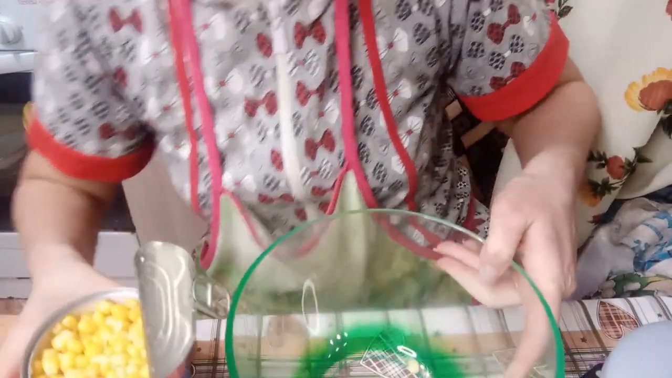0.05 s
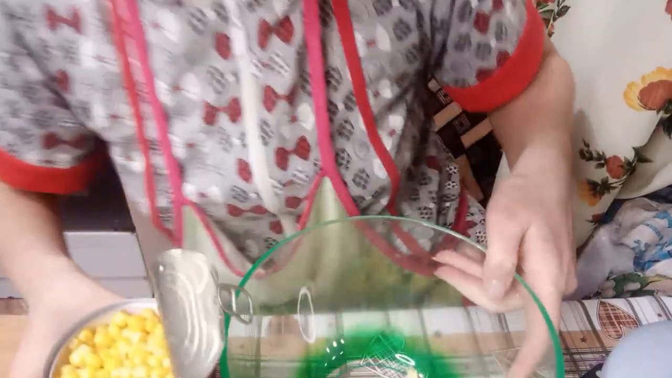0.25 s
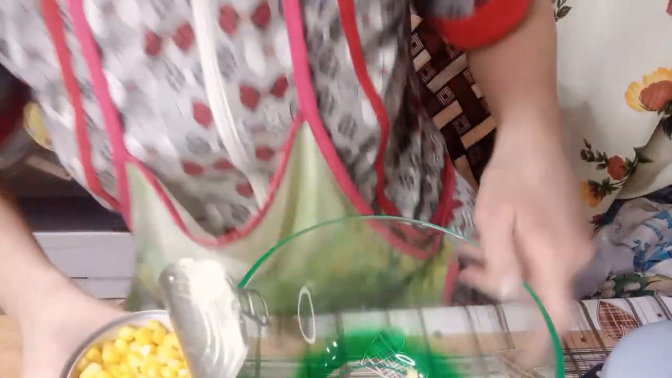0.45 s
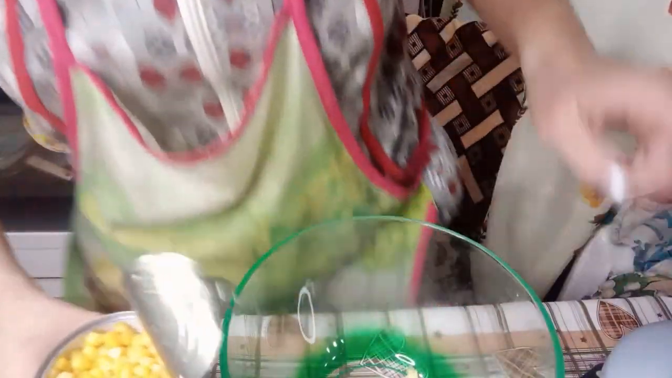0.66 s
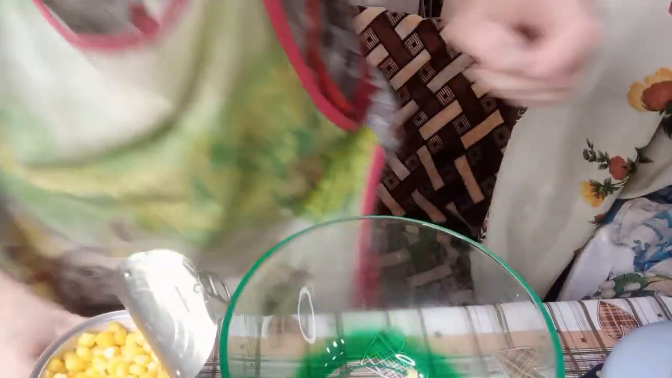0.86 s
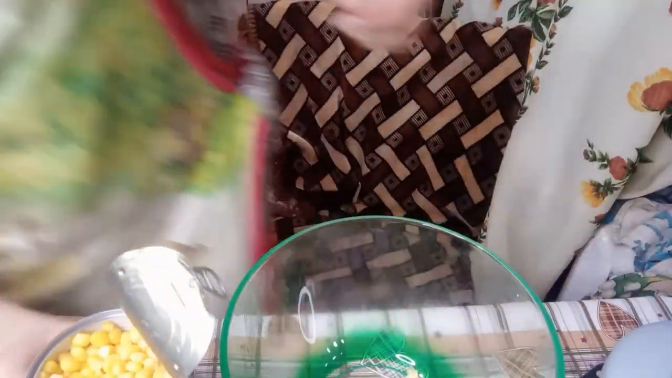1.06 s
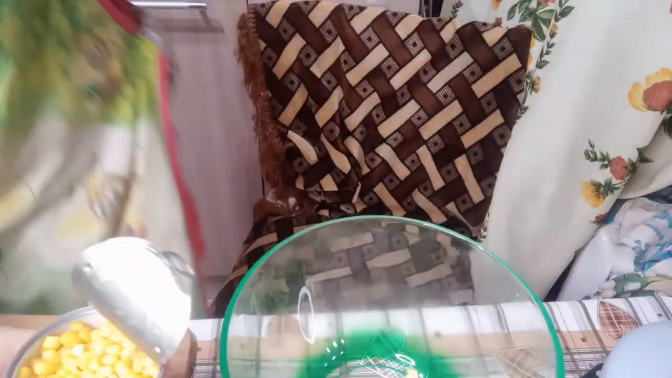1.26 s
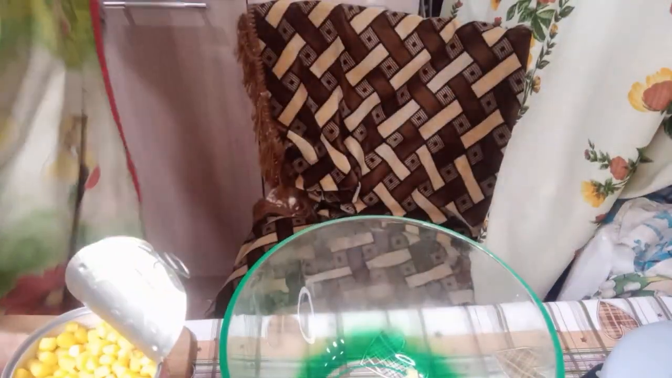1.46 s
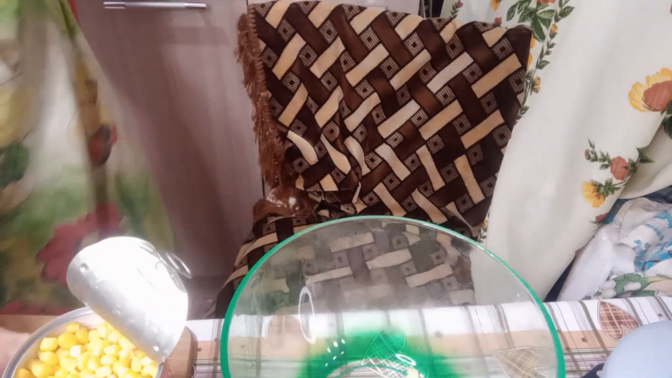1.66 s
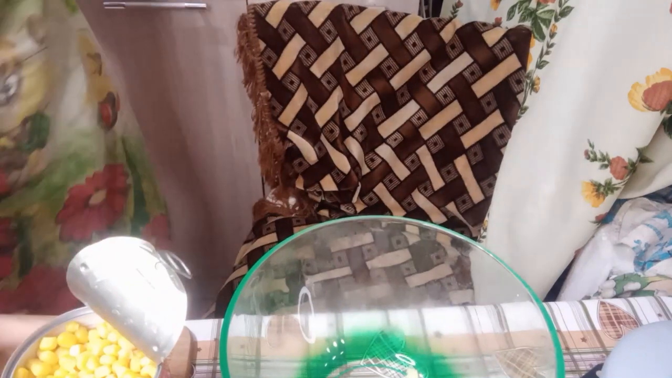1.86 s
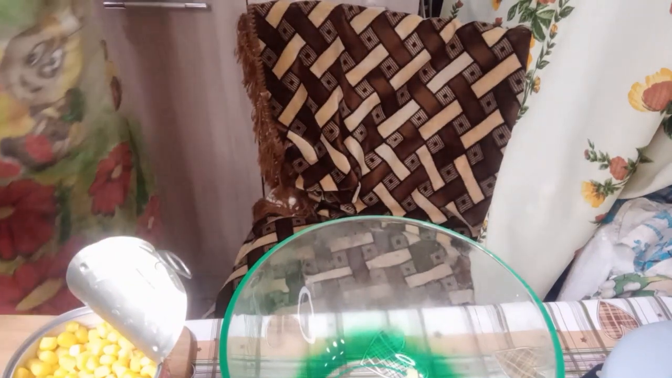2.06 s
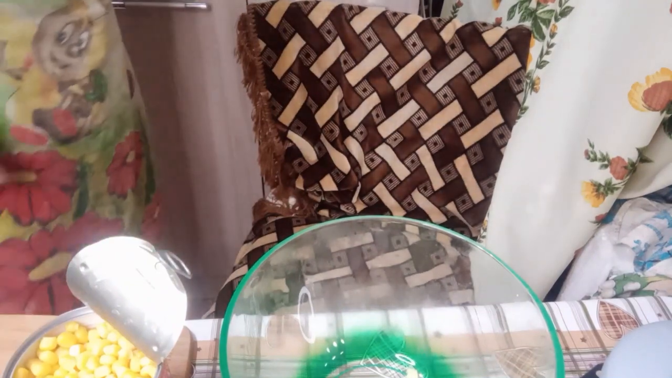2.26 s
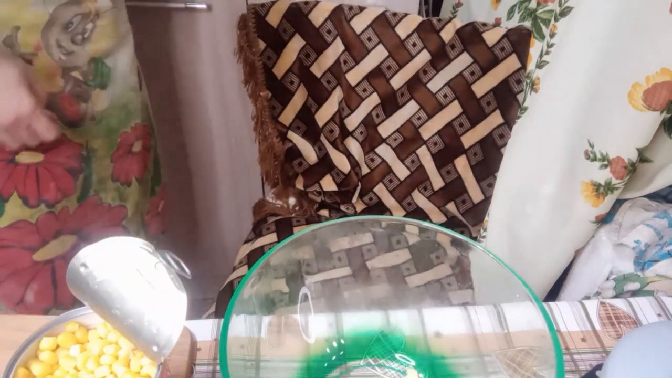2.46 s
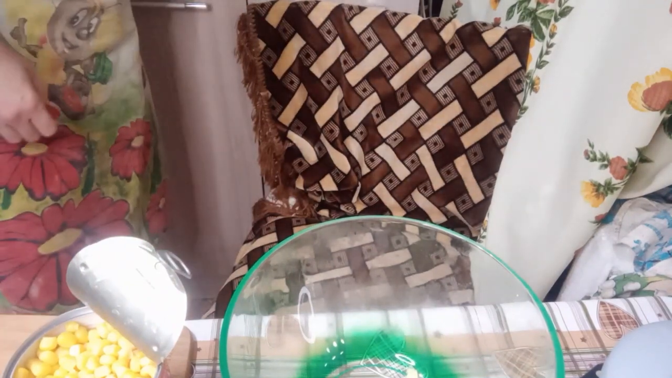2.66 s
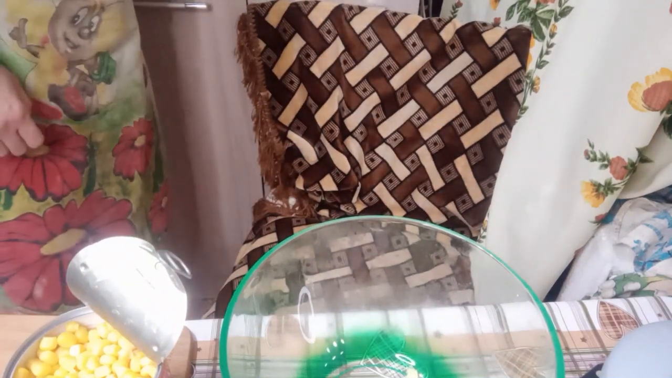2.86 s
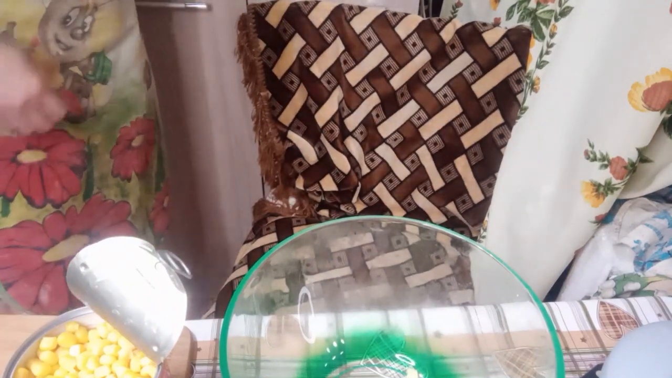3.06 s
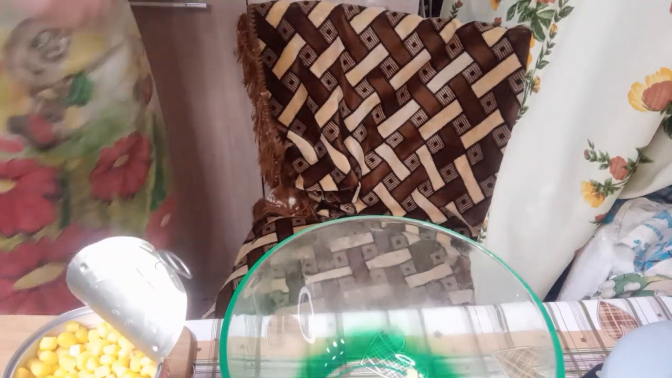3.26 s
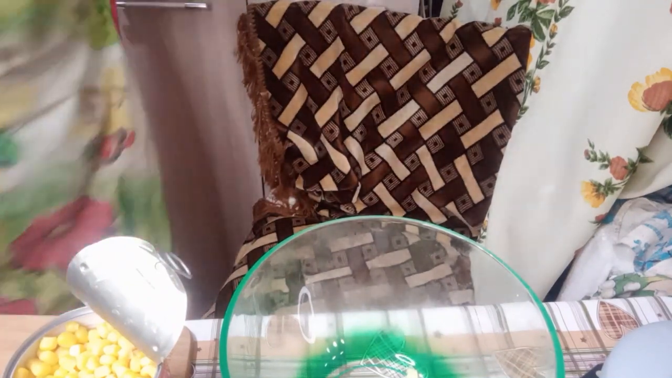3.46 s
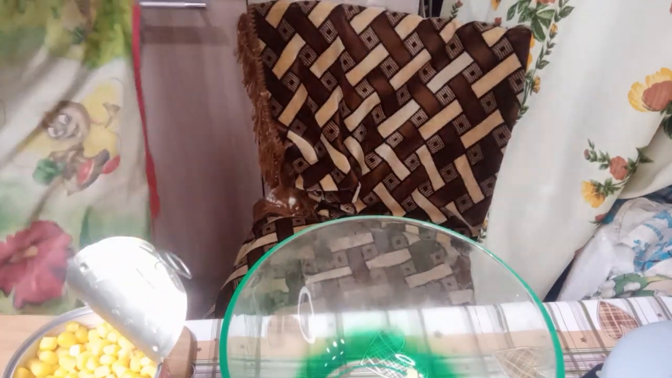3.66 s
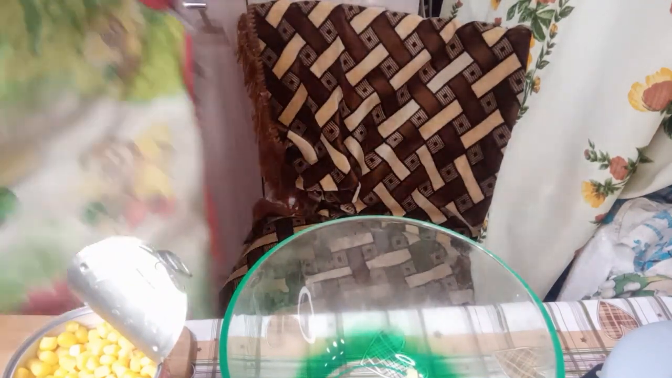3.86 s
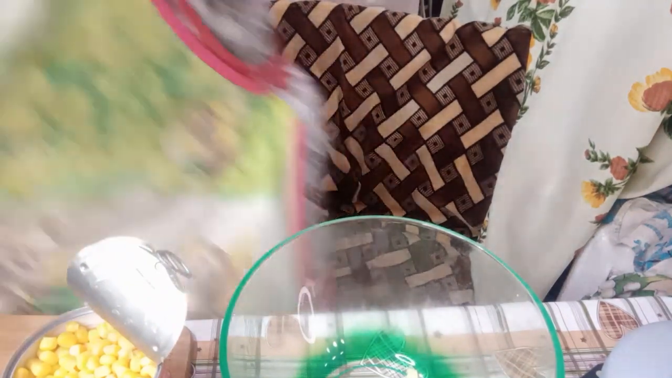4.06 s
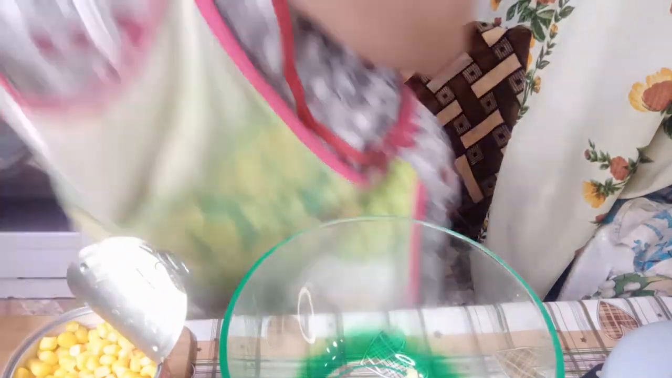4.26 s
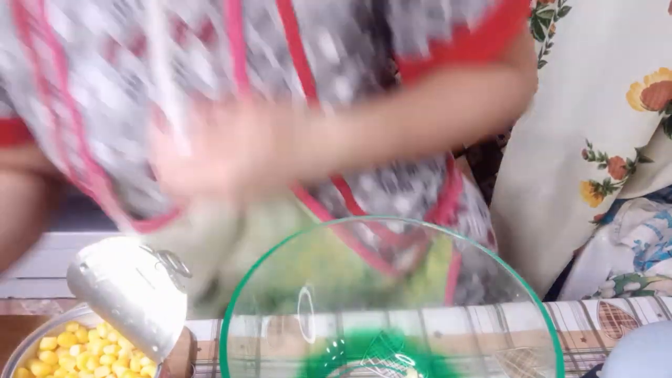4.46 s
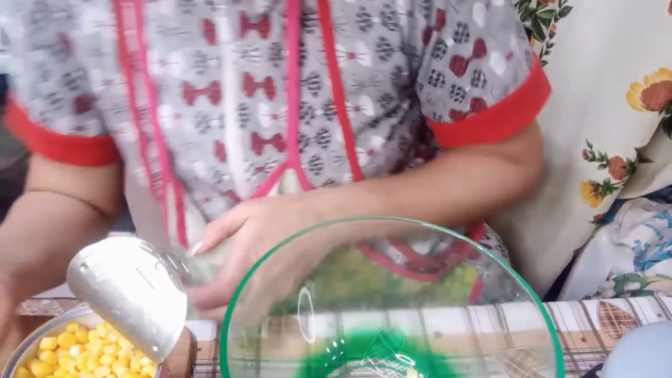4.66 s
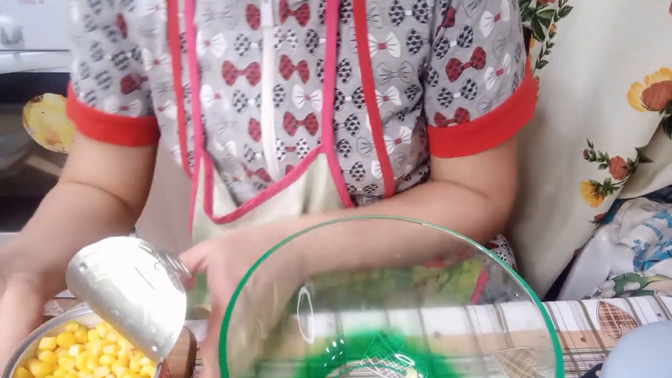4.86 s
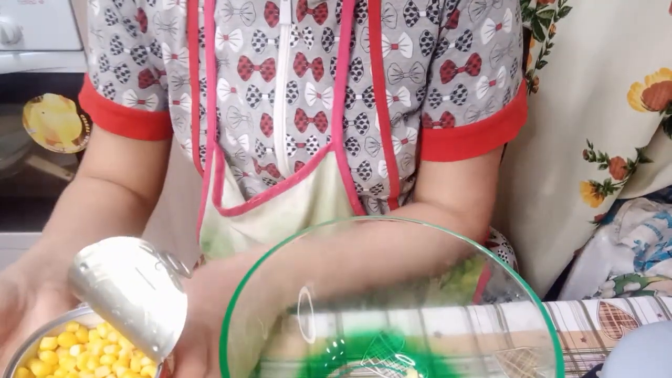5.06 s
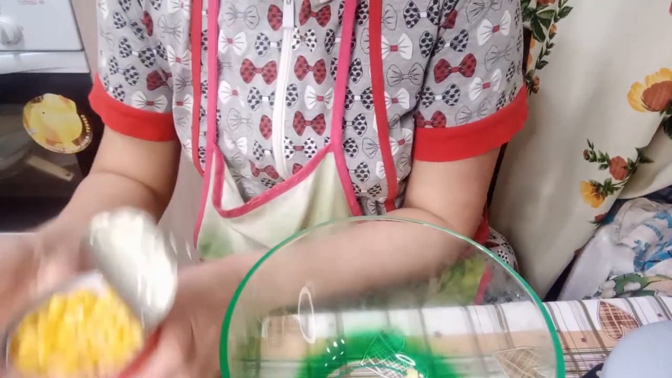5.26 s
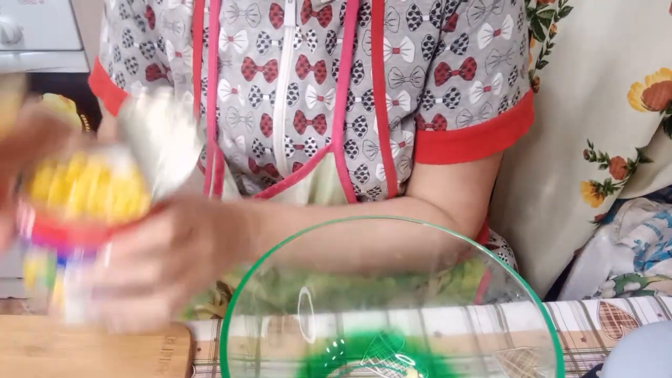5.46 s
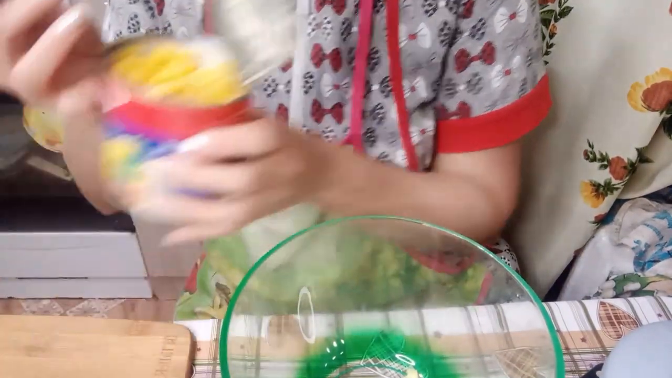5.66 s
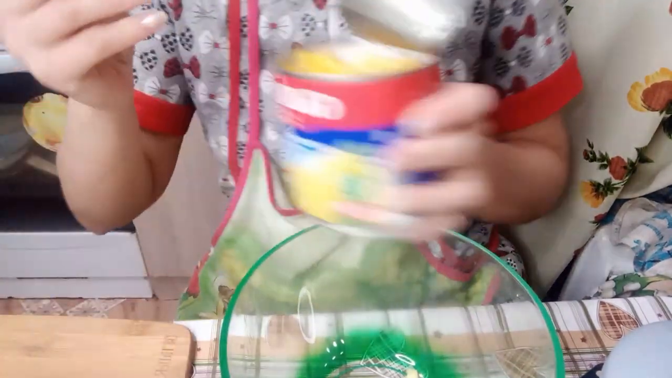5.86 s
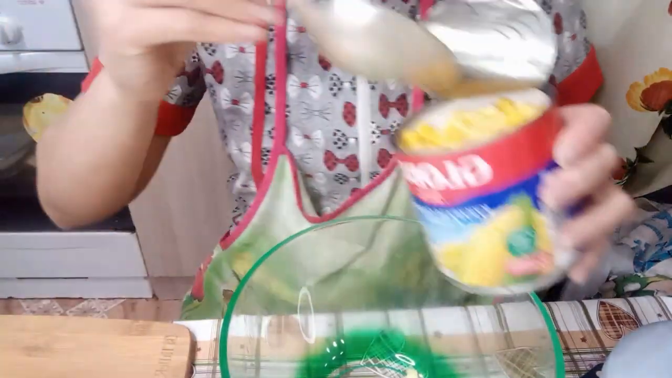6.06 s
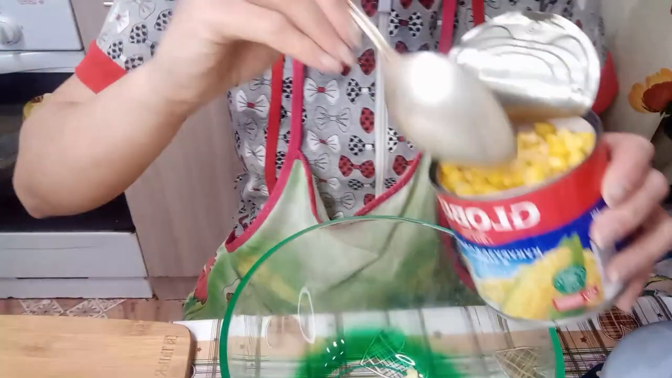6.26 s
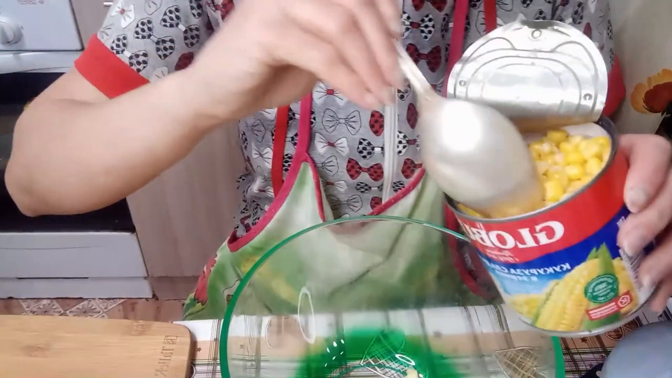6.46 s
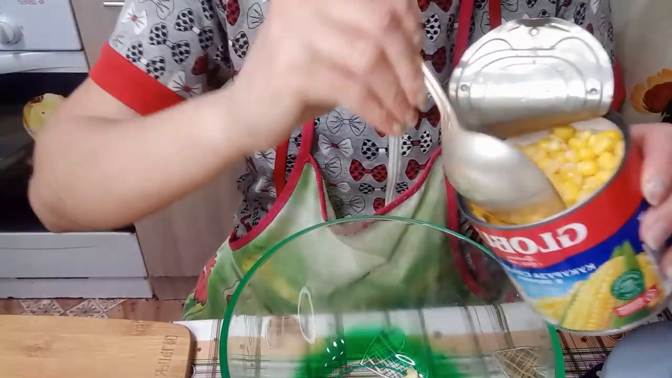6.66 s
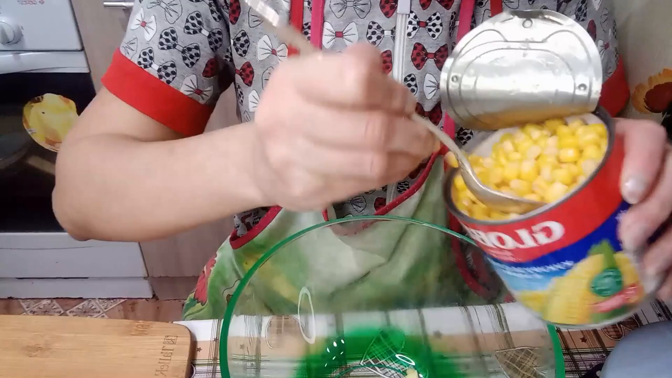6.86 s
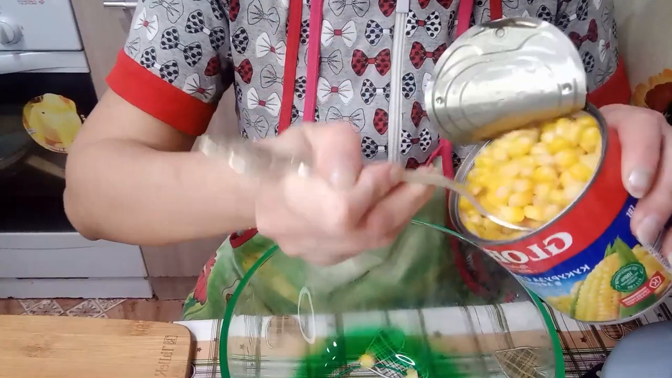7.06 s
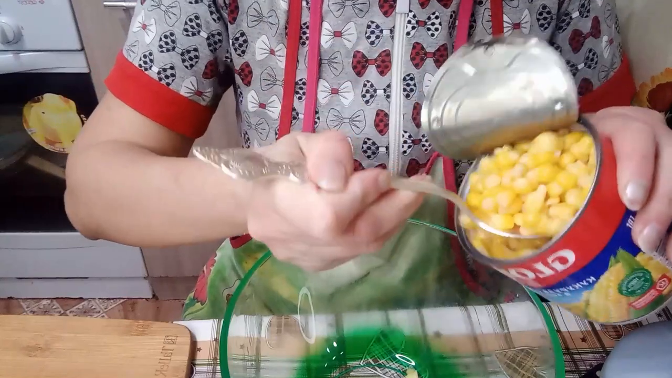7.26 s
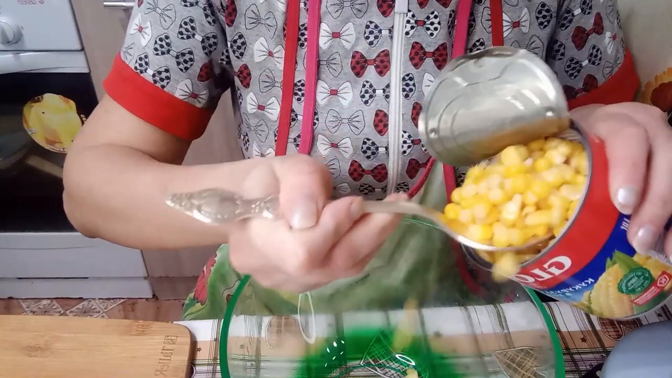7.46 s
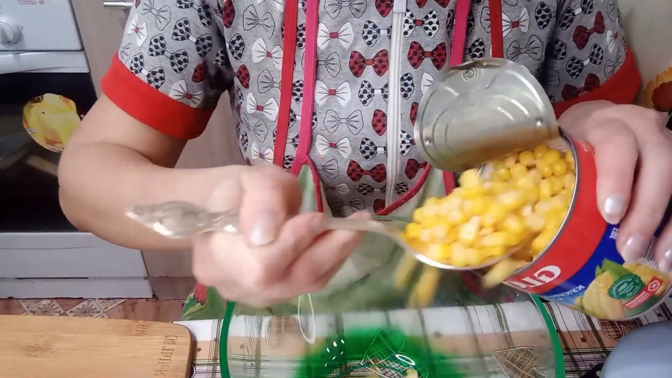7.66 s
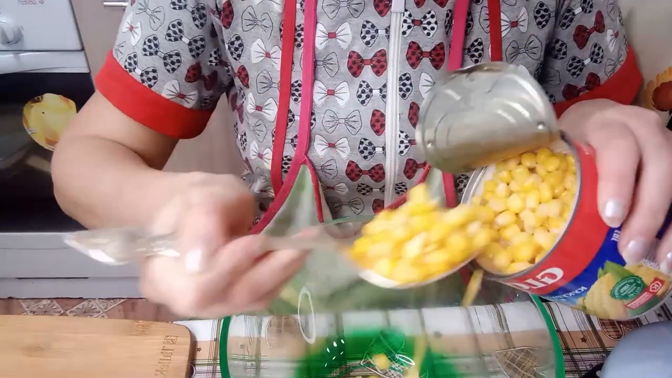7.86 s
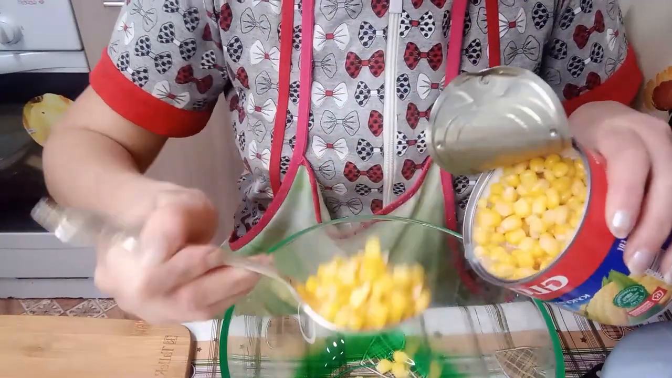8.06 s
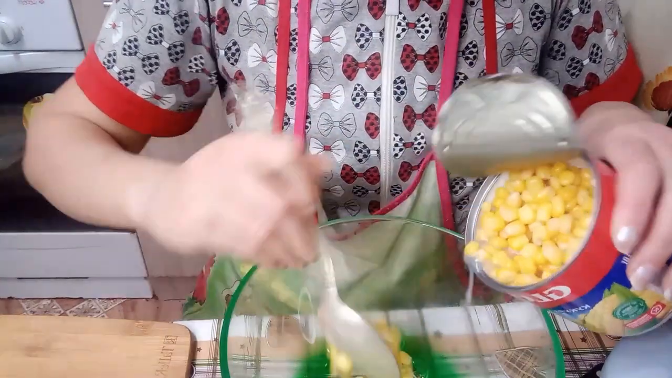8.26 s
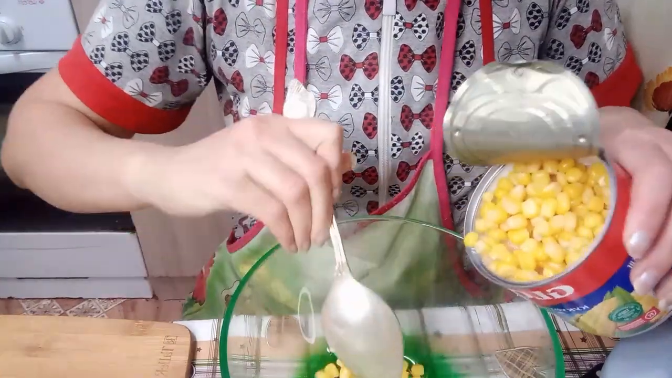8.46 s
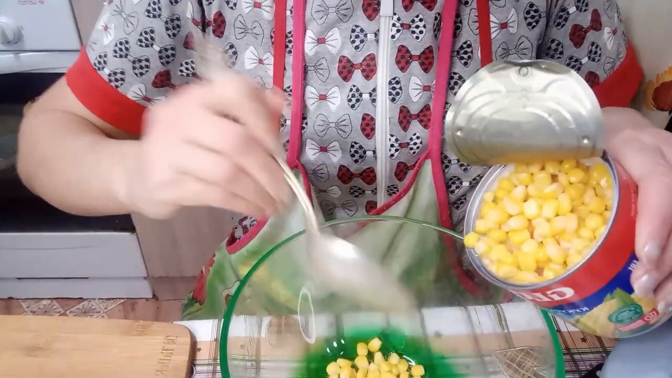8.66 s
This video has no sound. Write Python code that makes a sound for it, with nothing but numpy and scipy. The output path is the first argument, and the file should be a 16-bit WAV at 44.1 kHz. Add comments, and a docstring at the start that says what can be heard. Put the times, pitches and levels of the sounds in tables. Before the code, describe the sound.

Over faint room hiss, a metal lid taps glass and clothing and slippers scuff away. Knocks and a low woody drag mark a drawer opening, followed by a loud jangle of spoons. After a calmer return with a sudden rustling jolt, a spoon clanks hollowly on a full can. Muffled kernels then fall into a bowl with tiny juicy clicks, close to the microphone, with short kitchen echoes.

```python
"""A small kitchen, a phone on the table. Someone rises, opens a drawer and rattles out a spoon, sits down again,
taps the spoon on a full tin, rubs it past the rim and lets soft kernels drop into a glass bowl.
Clothes, chair and slippers rustle and rumble over a quiet room: all of these are shaped noise.
Struck things are sums of fading tones with a thud of noise; drawer and rim are rough, gliding tones.
Tiny clicks and pops add juice, skin and cloth; most sources also get a short echo from the walls."""
import sys
import numpy as np
from scipy import signal
from scipy.fft import rfft, irfft, next_fast_len
from scipy.io import wavfile
from scipy.ndimage import uniform_filter1d

SR = 44100
rng = np.random.default_rng(int(sys.argv[2]) if len(sys.argv) > 2 else 0)


def file_out(sig):
    """Save sig as 16-bit WAV at sys.argv[1]."""
    # one column per channel
    cols = np.atleast_2d(sig).T
    # limit, then scale
    lim = np.clip(cols, -1, 1)
    pcm = np.round(lim * 32767).astype(np.int16)
    wavfile.write(sys.argv[1], SR, pcm)


def gain_from_db(level_db):
    """Convert decibel levels to linear amplitude factors (20 dB per decade)."""
    decades = np.asarray(level_db, float) / 20
    return 10 ** decades


N = 384375
T = np.arange(N) / SR  # time of every sample [s]

# tone of the quiet room: (frequency [Hz], relative level per Hz [dB])
ROOM_TONE = [(15, -56), (30, -26), (55, -5.5), (130, -3.5), (230, -8), (300, -13), (450, -18.5),
             (1000, -24.5), (2750, -38.5), (6000, -49.5), (13500, -29.5), (16500, -40.5)]
ROOM_DB = -66
# how the microphone port colours sound: (frequency [Hz], gain [dB])
PORT_TONE = [(5800, -0.5), (6750, -5), (7500, -5), (10000, -0.5), (12000, -7), (13700, -6.5), (14500, 5),
             (15500, 7.5), (16200, -7), (16600, -27)]
ECHO_T60_LOW_S, ECHO_T60_HIGH_S = 0.18, 0.061  # time for the echo to fall by 60 dB

# how much the cook moves about, as a steady rustle: (time [s], level [dB])
STIR = [(0, -61), (.75, -60.5), (.92, -63), (1.36, -62), (1.55, -68.5), (2.75, -59.5), (2.9, -57.5),
        (3.08, -71.5), (3.45, -66), (3.78, -75), (4.4, -68.5), (4.62, -60), (5.0, -55), (5.28, -65.5),
        (5.5, -67.5), (5.9, -75)]
STIR_TREBLE_DB, STIR_RUMBLE_DB = -4.5, -4  # over the rubbing
# slippers, chair and drawer catching suddenly:
# (peak time [s], level [dB], fall [s], treble over rubbing [dB], rumble over rubbing [dB])
JOLTS = [(.005, -47.5, 0.082, -16, 6.5), (.345, -42.5, 0.056, -9.5, -5.5), (0.4, -40.5, 0.051, -23, -3.5),
         (1.163, -48.5, 0.064, 1, 5.5), (1.274, -51.5, 0.057, 4, 8), (1.705, -37, 0.042, 2.5, 6),
         (1.78, -44, 0.063, -7, 4.5), (4.071, -49, 0.074, 3, 1.5), (4.432, -49, 0.012, -10, -9),
         (4.467, -34.5, 0.026, -9.5, -7.5)]
JOLT_RISE_S = 0.012
# cloth sweeping over cloth and wood:
# (peak time [s], level [dB], fall [s], treble over rubbing [dB], rumble over rubbing [dB])
SWISHES = [(0.197, -50, 0.059, -6, 2), (1.026, -42, 0.059, -18.5, -8.5), (1.093, -46.5, 0.076, -9.5, 4),
           (2.169, -60, 0.043, 1.5, 12.5), (2.329, -61.5, 0.2, 4, -0.5), (3.924, -58, 0.27, -7.5, -13.5),
           (4.187, -47.5, 0.026, -6.5, -45.5), (5.151, -41.5, 0.046, -12.5, -1.5),
           (6.641, -63.5, 0.039, -5, -3)]
SWISH_RISE_SHARE = 0.53  # rise as a share of the fall
# tone of the rustling treble: (frequency [Hz], relative level per Hz [dB])
RUSTLE_TONE = [(1500, -28), (2800, 0.5), (6000, -1), (9500, -5.5), (13000, -17.5), (16500, -11.5)]
# dull bumps through table and floor: (peak time [s], level [dB])
BUMPS = [(2.72, -50.5), (3.92, -56), (4.09, -53.5), (5.0, -82), (5.6, -56), (8.259, -46.5), (8.53, -63)]
BUMP_RISE_S, BUMP_FALL_S = 0.067, 0.085
# fine hiss at the very top while the cook settles: (time [s], level [dB])
FINE_HISS = [(4.3, -71), (4.491, -80), (4.779, -79), (5.169, -57.5), (5.266, -86), (5.396, -58.5),
             (5.6, -93)]

# lid of the tin touching the bowl: (time [s], level [dB], contact [ms])
LID_TAPS = [(0.275, -17, 0.12), (0.328, -27, 0.15)]
# tones of the lid: (frequency [Hz], relative level [dB], time to fall 60 dB [s])
LID_MODES = [(1117, 18, 0.018), (1624, 2, 0.095), (2230, 11, 0.015), (3550, 12.5, 0.035), (4743, 8, 0.07),
             (6320, -10, 0.23), (8600, -15, 0.079), (11860, -20, 0.079), (15200, -12, .08)]
# spoon on the full tin: (time [s], level [dB], contact [ms])
TIN_TAPS = [(6.2645, -6.5, 0.08), (6.324, -15.5, 0.035), (6.354, -40, 0.28), (6.433, -16.5, 0.11)]
# tones of the tin: (frequency [Hz], relative level [dB], time to fall 60 dB [s])
TIN_MODES = [(130, -9, 0.084), (230.7, 13, 0.037), (477, 2, 0.045), (590, -12, 0.17), (853, 16, 0.028),
             (1176, -12, 0.076), (1535, 11.5, 0.041), (1484, -23.5, 0.47), (2075, -12, 0.018),
             (2542, -11.5, 0.41), (3110, -13, .05), (3430, -20.5, .06), (3840, -25, .25), (5512, -20, 0.11),
             (7360, -20, 0.1), (8000, -10, .09), (8900, -23.5, 0.22), (9415, -24, 0.16)]

# knocks on drawer and table: (time [s], level [dB], main pitch [Hz], time to fall 60 dB [s])
KNOCKS = [(0.545, -21, 581, 0.01), (1.624, -21.5, 837, 0.033), (1.696, -19, 603, 0.012),
          (1.71, -24.5, 239.5, 0.045), (2.696, -30, 597, 0.022), (4.453, -52, 900, 0.023),
          (8.095, -36.5, 101.7, 0.031)]
# tones of a wooden panel: (multiple of main pitch [ratio], relative level [dB])
WOOD_MODES = [(.25, -12.5), (.62, -8), (1.001, 5.5), (1.549, -9), (2.1, -9.5), (2.6, -4)]

# small wet and dry ticks: (time [s], level [dB], centre frequency [Hz])
TICKS = [(1.427, -45.5, 3220), (4.6198, -35.5, 6000), (4.957, -39, 11000), (5.6524, -46.5, 7670),
         (6.6568, -53, 5880), (6.727, -58, 8300), (6.887, -54.5, 5330), (7.44, -44, 6100),
         (7.661, -28, 11530), (7.813, -45, 7000), (7.8373, -38, 9350), (8.004, -46.5, 2820),
         (8.2155, -46, 6040), (8.236, -37, 9300), (8.348, -53.5, 6050)]
TICK_OCTAVES, TICK_OCTAVES_PER_DB, FAINT_TICK_DB = 0.41, 1, -46.5  # a harder tick is wider

# drawer groaning on its runners: (time [s], hollow resonance [Hz], level [dB])
GROAN = [(1.885, 623.4, -55), (1.905, 604, -37.5), (1.97, 563.4, -59), (2.02, 207.5, -48),
         (2.09, 225, -48.5), (2.17, 424.2, -54), (2.33, 507.4, -55), (2.78, 605, -75), (2.87, 650, -61),
         (3.06, 616, -68.5)]

# cutlery jostling: (time [s], level [dB], rattle length [s], brightness [0-1])
RATTLES = [(2.396, -21, 0.08, 0.28), (2.4868, -12.5, 0.039, 0.6), (2.56, -28, 0.041, 0.53),
           (2.6288, -5, 0.025, 0.79), (2.6654, 1, 0.021, 0.9), (2.6803, -1.5, 0.013, 0.5),
           (2.6913, -10, 0.041, 0.8)]
# tones of the steel: (frequency [Hz], relative level [dB], time to fall 60 dB [s])
CUTLERY_MODES = [(2970, 6, 0.039), (3060, 7.5, 0.05), (4214, -7.5, 0.1), (5527, 3.5, 0.074),
                 (7750, -4, 0.07), (8900, -2, .09), (9550, -0.5, 0.09), (12300, 1.5, 0.1),
                 (14580, 0, 0.092), (15300, -1.5, 0.09)]
# tone of the clicks between the pieces: (frequency [Hz], relative level per Hz [dB])
CLASH_TONE = [(180, -18.5), (400, -17.5), (720, -7.5), (1200, -12.5), (2600, -6), (3120, -3.5), (3700, -11),
              (6000, -10.5), (10000, -16), (16500, -11)]
# side of the cutlery: (frequency [Hz], left over right [dB])
CUTLERY_SIDE = [(2400, 0), (4400, 3.5), (8100, -6), (14000, 1)]
STEEL_DB, STEEL_DB_PER_BRIGHT = -49.5, 21.5  # brighter clashes ring the steel more

# spoon squeaking along the rim: (time [s], slip rate [Hz], level [dB])
SQUEAK = [(6.531, 590, -57), (6.6, 524.5, -60.5), (6.69, 517, -57.5), (6.74, 607, -62), (6.762, 564, -66)]

# kernels landing in the bowl: (time [s], level [dB])
KERNELS = [(6.982, -32.5), (7.133, -48), (7.44, -42.5), (7.55, -37.5), (7.614, -35.5), (7.659, -25.5),
           (7.731, -34.5), (7.808, -30), (7.89, -38), (8.01, -42), (8.208, -35.5), (8.222, -29),
           (8.279, -34), (8.364, -49.5)]
# lesser kernels tumbling in showers: (start [s], end [s], level [dB])
SHOWERS = [(7.67, 7.928, -44), (8.224, 8.34, -46)]
SHOWER_PER_S = 35
# tones of the air in the bowl: (frequency [Hz], relative level [dB], time to fall 60 dB [s])
BOWL_AIR_MODES = [(275.5, -3.5, 0.08), (333, -11.5, 0.097), (437, -8.5, 0.11), (537, -8, 0.07),
                  (717, -10, 0.028), (800, -28, 0.076), (920, -14, 0.03)]
# kernels and drops that strike bare glass: (time [s], level [dB])
GLASS_PINGS = [(7.441, -46.5), (7.614, -58), (7.659, -64), (7.81, -50.5), (7.89, -61.5), (8.234, -54),
               (8.277, -53)]
# tones of the glass: (frequency [Hz], relative level [dB], time to fall 60 dB [s])
GLASS_MODES = [(5960, 12, 0.096), (8270, 4, 0.092), (8900, 8, .08), (15100, 5, 0.087)]
LESSER_PING_DB = -22.5  # glass ring of a lesser kernel, under its thud

# juice crackling between the kernels: (start [s], end [s], highest level [dB])
CRACKLE = [(7.448, 7.6, -57), (7.654, 7.95, -63), (8.213, 8.37, -57)]
CRACKLE_PER_S = 90


def band(x, lo_hz, hi_hz, order=2):
    """Keep only the sound between two frequencies (Butterworth band-pass)."""
    edges = [lo_hz, min(hi_hz, 0.45 * SR)]
    return signal.sosfilt(signal.butter(order, edges, "band", fs=SR, output="sos"), x)


def high_pass(x, hz, order):
    """Take away the bass below a frequency."""
    return signal.sosfilt(signal.butter(order, hz, "high", fs=SR, output="sos"), x)


def low_pass(x, hz, order):
    """Take away the sound above a frequency."""
    return signal.sosfilt(signal.butter(order, hz, fs=SR, output="sos"), x)


def unit(x):
    """Scale to rms 1."""
    return x / np.sqrt(np.mean(x ** 2))


def colour(x, points):
    """Shape the tone of a sound by (frequency [Hz], gain [dB]) points."""
    hz, db = np.transpose(points)
    size = next_fast_len(x.shape[-1])
    f = np.arange(size // 2 + 1) * SR / size + 1
    gain = gain_from_db(np.interp(np.log(f), np.log(hz + 1), db))
    return irfft(rfft(x, size) * gain, size)[..., :x.shape[-1]]


def add(out, s, sound):
    """Mix a sound in at a time."""
    i = int(s * SR)
    out[..., i:i + sound.shape[-1]] += sound[..., :N - i]


def grit(shape, spread_db):
    """Noise of uneven grains: chance makes some of them louder."""
    return rng.standard_normal(shape) * gain_from_db(spread_db * np.minimum(rng.exponential(size=shape), 5))


def stereo(x, lag, left_db):
    """A near source: the left port hears it lag samples late and left_db louder than the right."""
    late = np.interp(np.arange(N) - lag, np.arange(N), x)
    return np.array([late * gain_from_db(left_db / 2), x * gain_from_db(-left_db / 2)])


def wide(likeness, lag, spread_db):
    """Two channels of grit that share a part; likeness is the shared power, 0 to 1."""
    n = grit((3, N), spread_db)
    likeness = np.clip(likeness, 0, 1)
    return np.sqrt(likeness) * stereo(n[0], lag, 0) + np.sqrt(1 - likeness) * n[1:]


def flicker(rate_hz, db):
    """Quick random level changes as gain; db is their spread before smoothing."""
    k = int(SR / rate_hz)
    steps = np.repeat(rng.standard_normal(N // k + 1), k)
    return gain_from_db(db * uniform_filter1d(steps, k // 2)[:N])


def swell(s, db, rise, fall):
    """Power of a rub that swells to its peak and dies away."""
    growing = np.exp(-((T - s) / rise) ** 2)
    dying = np.exp(-np.abs(T - s) / fall * 2)
    return gain_from_db(db) ** 2 * np.where(T < s, growing, dying)


def echoes(x):
    """Walls of a small kitchen: a dense tail, shorter in the treble; long bass waves reach both ports alike."""
    t = np.arange(int(0.4 * SR)) / SR
    n = rng.standard_normal((3, len(t))) * (1 - np.exp(-t / 0.0065))
    low = band(n[0], 60, 450, order=1) + band(n[1:], 550, 840, order=1)
    high = band(n[1:], 1200, 18000, order=1)
    tail = low * 1000.0 ** (-t / ECHO_T60_LOW_S) + high * 1000.0 ** (-t / ECHO_T60_HIGH_S)
    tail = tail / np.sqrt(np.sum(tail ** 2, axis=1, keepdims=True))
    return signal.oaconvolve(x[None], tail, axes=1)[:, :N]


def ring(modes, contact_ms, scatter_db, blur, rise_ms, dense=(-40, 9000, 0.03)):
    """Modes struck at a new spot by a soft contact, each beating with two weaker neighbours; peak 1.
    dense = (level [dB], top [Hz], time to fall 60 dB [s]) of the many lesser modes that blur into a thud."""
    hz, db, t60 = np.transpose(np.repeat(modes, 3, axis=0))[:, :, None]
    t = np.arange(int(0.45 * SR)) / SR
    chance = rng.standard_normal((3, len(hz), 1))
    beside = (np.arange(len(hz)) % 3 > 0)[:, None]  # true for the two neighbours of each mode
    gain = gain_from_db(db + scatter_db * chance[0] - 8.1 * beside) * np.sign(chance[1])
    tones = np.sin(2 * np.pi * hz * (1 + blur * beside * chance[2]) * t)
    y = np.sum(gain * tones * 1000.0 ** (-t / t60), axis=0)
    push = t * np.exp(-t / (max(contact_ms, 0.01) / 4000))  # a longer contact dulls the treble
    y = signal.fftconvolve(y, push[:400])[:len(t)]
    dense_db, top_hz, dense_t60 = dense
    thud = unit(band(rng.standard_normal(len(t)), 120, top_hz, order=4)) * 1000.0 ** (-t / dense_t60)
    onset = 1 - np.exp(-(t * 1000 / rise_ms) ** 2)
    y = (y / np.abs(y).max() + gain_from_db(dense_db) * thud) * onset
    return y / np.abs(y).max()


def rub(table, partials):
    """Rough friction through a moving resonance; partials = (multiple [ratio], level [dB], width [Hz])."""
    s, hz, db = np.transpose(table)
    phase = 2 * np.pi * np.cumsum(np.interp(T, s, hz)) / SR
    out = 0
    for k, gain_db, width_hz in partials:
        # slow noise roughens each partial, spreading it into a band
        a, b = low_pass(rng.standard_normal((2, N)), width_hz / 2, 2)
        out = out + gain_from_db(gain_db) * unit(a * np.cos(k * phase) + b * np.sin(k * phase))
    return out * gain_from_db(np.interp(T, s, db)) * (T > s[0]) * (T < s[-1])


def taps(events, modes, lag, echo_db, crack_db, blur, rise_ms, dense):
    """Metal taps: the object's modes and the crack of first contact."""
    out = np.zeros(N)
    t = np.arange(600) / SR
    for s, db, contact_ms in events:
        add(out, s, gain_from_db(db) * ring(modes, contact_ms, 0.33, blur, rise_ms, dense))
        burst = rng.standard_normal(len(t)) * np.exp(-t / 0.00027)
        add(out, s, gain_from_db(db + crack_db) * band(burst, 1500, 17000, order=1))
    return stereo(out, lag, 0) + gain_from_db(echo_db) * echoes(out)


def room():
    """Quiet air and microphone hiss; the bass is partly alike left and right and wavers."""
    alike = colour(wide(0.34, 7.7, 0), ROOM_TONE)
    apart = colour(wide(0.03, 0, 0), ROOM_TONE)
    bass = low_pass(alike, 600, 1) * flicker(16, 1.5)
    treble = (apart - low_pass(apart, 600, 1)) * flicker(1, 0.73)
    return unit(bass + treble) * gain_from_db(ROOM_DB)


def layers(treble_db, rumble_db):
    """Power of rubbing, treble and rumble, as three rows beside the rubbing."""
    return gain_from_db(np.array([[0], [treble_db], [rumble_db]])) ** 2


def movement():
    """Jolts and swishes swell and fade over a steady rustle: grainy rubbing and treble, with a low rumble."""
    power = gain_from_db(np.interp(T, *np.transpose(STIR))) ** 2 * layers(STIR_TREBLE_DB, STIR_RUMBLE_DB)
    for s, db, fall, *mix in JOLTS:
        power = power + swell(s, db, JOLT_RISE_S, fall) * layers(*mix)
    for s, db, fall, *mix in SWISHES:
        power = power + swell(s, db, SWISH_RISE_SHARE * fall, fall) * layers(*mix)
    rub_level, treble_level, rumble_level = np.sqrt(power)
    cloth = unit(band(wide(0.14, 6.6, 1.1), 400, 1990)) * rub_level * flicker(60, 0.86)
    treble = unit(colour(wide(0.28, 5.7, 2.1), RUSTLE_TONE)) * treble_level * flicker(45, 1.2)
    rumble = unit(band(wide(0.73, 14, 0.64), 85, 590)) * rumble_level * flicker(22, 3.5)
    return cloth + treble + rumble


def bumps():
    """Table and floor boards answer a bump with a dull swell of low noise."""
    power = sum(swell(s, db, BUMP_RISE_S, BUMP_FALL_S) for s, db in BUMPS)
    return unit(band(wide(0.9, 11, 0), 100, 260)) * np.sqrt(power)


def lid_taps():
    """The tin's lid touches the bowl: thin metal gives short, bright tones."""
    return taps(LID_TAPS, LID_MODES, 5.5, -2.5, -30.0, 0.015, 0.22, (-15, 14000, 0.07))


def knocks():
    """Wooden panels: a few damped modes around each knock's own pitch."""
    out = np.zeros(N)
    for s, db, hz, t60 in KNOCKS:
        modes = [(k * hz, level_db, t60) for k, level_db in WOOD_MODES]
        add(out, s, gain_from_db(db) * ring(modes, 0.38, 0.74, 0.088, 0.6, (-6, min(3.3 * hz, 1750), 0.04)))
    return stereo(out, 11, 0) + gain_from_db(-3.5) * echoes(out)


def ticks():
    """Short clicks of juice, skin and cloth: brief bursts of noise in a band."""
    out = np.zeros(N)
    t = np.arange(900) / SR
    for s, db, hz in TICKS:
        octaves = max(TICK_OCTAVES + TICK_OCTAVES_PER_DB * (db - FAINT_TICK_DB), 0.2)
        half = 2 ** (octaves / 2)
        click = band(rng.standard_normal(len(t)) * np.exp(-t / 0.002), hz / half, hz * half)
        add(out, s, gain_from_db(db) * click / np.abs(click).max())
    return stereo(out, 4.0, -3.5) + gain_from_db(-3.5) * echoes(out)


def drawer():
    """Wood drags on wood and sounds the hollow drawer."""
    x = rub(GROAN, [(0.96, 0, 160), (0.19, -9, 90), (2.0, -8.5, 180)])
    return stereo(x, 12.0, 0) + gain_from_db(-9.5) * echoes(x)


def cutlery():
    """Spoons and forks strike each other in swarms of clicks; each swarm rings the steel in its own way."""
    out, clash = np.zeros((2, 2, N))
    t = np.arange(int(0.2 * SR)) / SR
    for s, db, length, bright in RATTLES:
        clicks = unit(grit((2, len(t)), 4.3)) * (1 - np.exp(-t / 0.0004)) * np.exp(-(t / length) ** 2)
        bright = np.clip(bright, 0, 1)
        sharp = bright * band(clicks, 6500, 13000, order=1)
        dull = (1 - bright) * band(clicks, 200, 7600, order=1)
        swarm = gain_from_db(db) * (sharp + dull)
        steel = signal.fftconvolve(swarm, ring(CUTLERY_MODES, 0.019, 4.0, 0.012, 0.058)[None], axes=1)
        add(clash, s, swarm)
        add(out, s, steel * gain_from_db(STEEL_DB + STEEL_DB_PER_BRIGHT * bright))
    out = out + colour(clash, CLASH_TONE) * gain_from_db(5.5)
    out = out + gain_from_db(1.5) * echoes(out[0])
    left = colour(out[0], [(hz, db / 2) for hz, db in CUTLERY_SIDE])
    right = colour(out[1], [(hz, -db / 2) for hz, db in CUTLERY_SIDE])
    return np.array([left, right])


def fine_hiss():
    """A thin, flickering hiss in the highest treble while the cook settles."""
    s, db = np.transpose(FINE_HISS)
    level = gain_from_db(np.interp(T, s, db, left=-120, right=-120))
    return unit(band(wide(0.1, 7.3, 2), 12000, 16200)) * level * flicker(28, 2)


def tin_taps():
    """The spoon strikes the full tin: strong low tones under weaker high ones."""
    return taps(TIN_TAPS, TIN_MODES, 1, -8.0, -25.0, 0.01, 0.58, (-14, 1650, 0.11))


def squeak():
    """The spoon sticks and slips on the rim: a rough tone, its octave and a rasp above."""
    x = rub(SQUEAK, [(1, -4.5, 30.5), (2, -7.5, 120), (3, -15, 210)])
    return stereo(x, 2.1, 0) + gain_from_db(0.0) * echoes(x)


def kernels():
    """Soft thuds drive the bowl's air and the table under it; bare glass rings faintly."""
    out = np.zeros(N)
    lesser = []
    for start, end, db in SHOWERS:
        for s in np.arange(start, end, 1 / SHOWER_PER_S):
            lesser.append((s + rng.uniform() / SHOWER_PER_S, db + 3 * rng.standard_normal()))
    for s, db in KERNELS + lesser:
        add(out, s, gain_from_db(db) * ring(BOWL_AIR_MODES, 0.93, 1.1, 0.046, 0.89, (-5, 780, 0.09)))
    for s, db in GLASS_PINGS + [(s, db + LESSER_PING_DB) for s, db in lesser]:
        add(out, s, gain_from_db(db) * ring(GLASS_MODES, 0.039, 1.4, 0.0032, 0.2))
    return stereo(out, 1.6, 4.2) + gain_from_db(-6.0) * echoes(out)


def crackle():
    """Tiny wet pops of juice: fast-fading tones at random pitch and size."""
    out = np.zeros(N)
    t = np.arange(300) / SR
    for start, end, db in CRACKLE:
        for s in np.arange(start, end, 1 / CRACKLE_PER_S):
            late, high, faint = rng.uniform(size=3)
            hz = 1100 * 2 ** (1.64 * high)
            pop = np.sin(2 * np.pi * hz * t) * np.exp(-t * hz / 2.0)
            add(out, s + late / CRACKLE_PER_S, gain_from_db(db - 8.2 * faint) * pop)
    return stereo(out, 2.0, 3) + gain_from_db(4.5) * echoes(out)


def scene():
    """All sources in the kitchen; small objects send out no deep bass."""
    background = room() + movement() + bumps() + fine_hiss()
    wood = knocks() + drawer()
    metal = lid_taps() + cutlery() + tin_taps() + squeak()
    food = kernels() + crackle() + ticks()
    return background + high_pass(wood + metal + food, 75, 2)


def roll_off(x):
    """The treble ends steeply here."""
    return signal.sosfilt(signal.butter(12, 16960, fs=SR, output="sos"), x)


def record(dry):
    """The phone's port colours the treble; the phone cuts the deepest bass and rounds the loudest peaks."""
    coloured = colour(dry, PORT_TONE)
    mix = np.tanh(high_pass(coloured, 30, 1))
    return roll_off(mix)


dry = scene()
out = record(dry)
file_out(out)
```